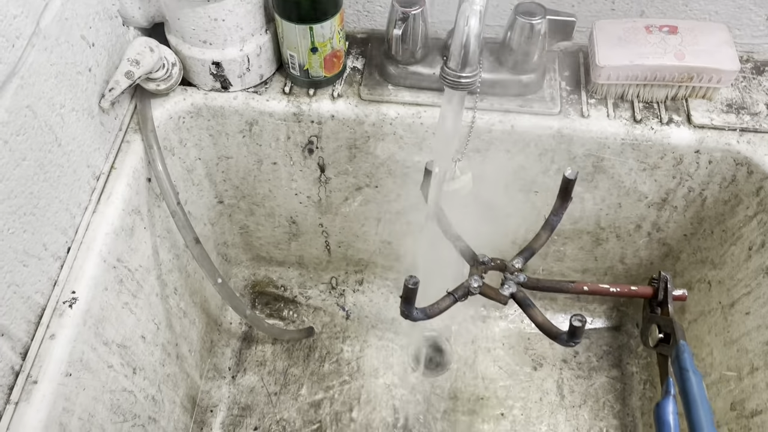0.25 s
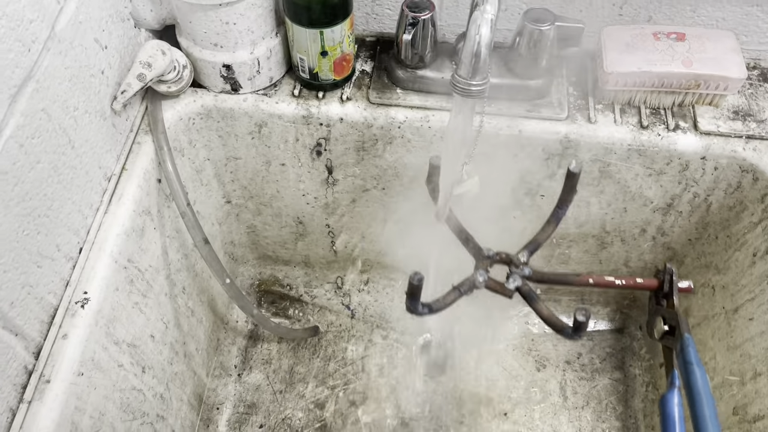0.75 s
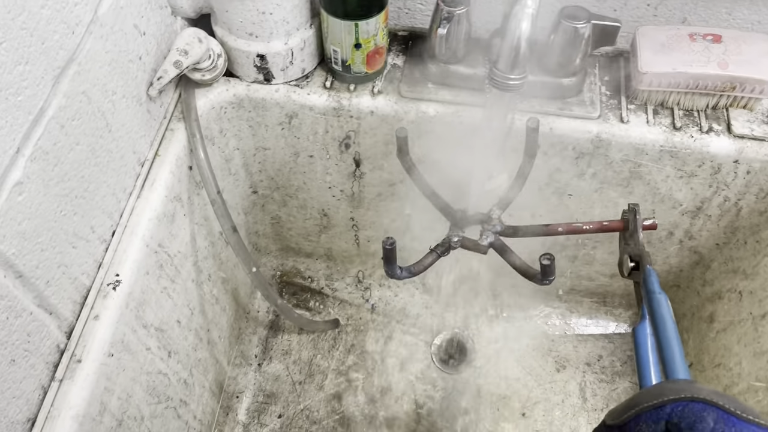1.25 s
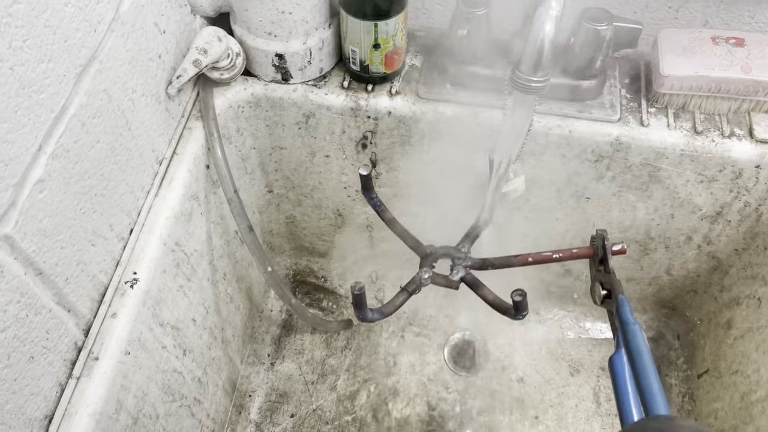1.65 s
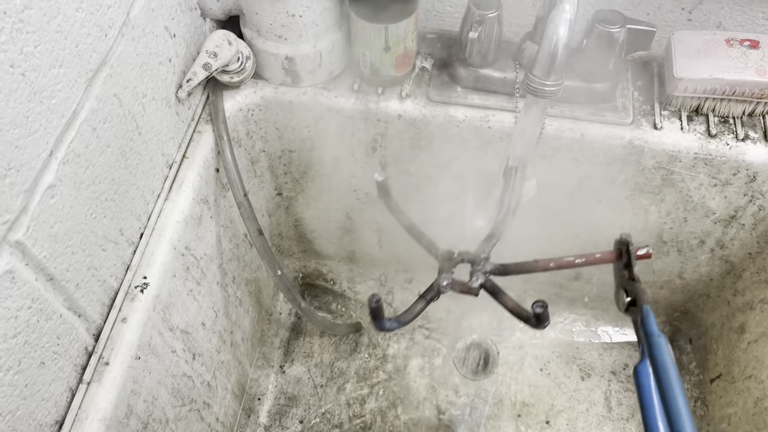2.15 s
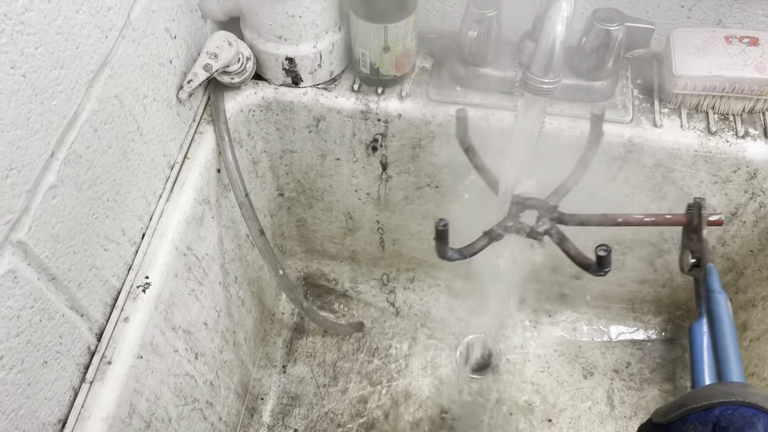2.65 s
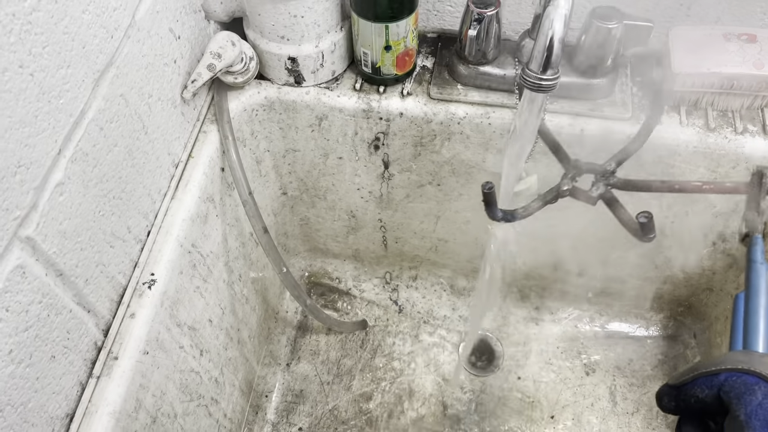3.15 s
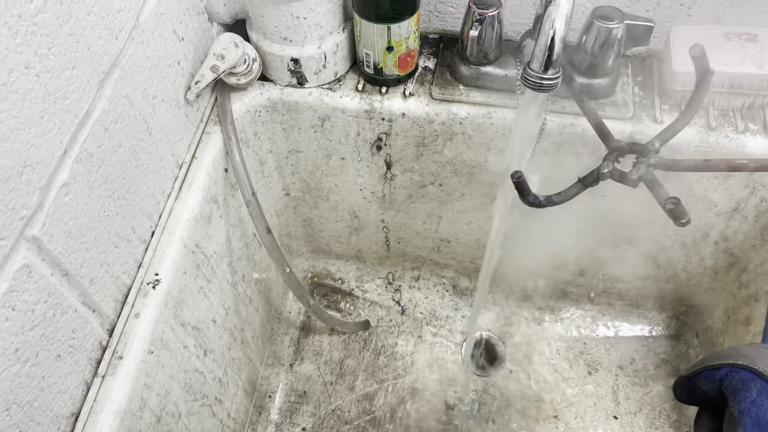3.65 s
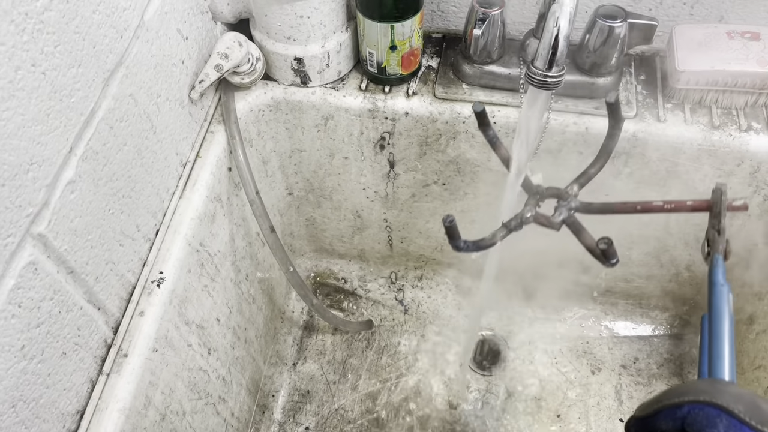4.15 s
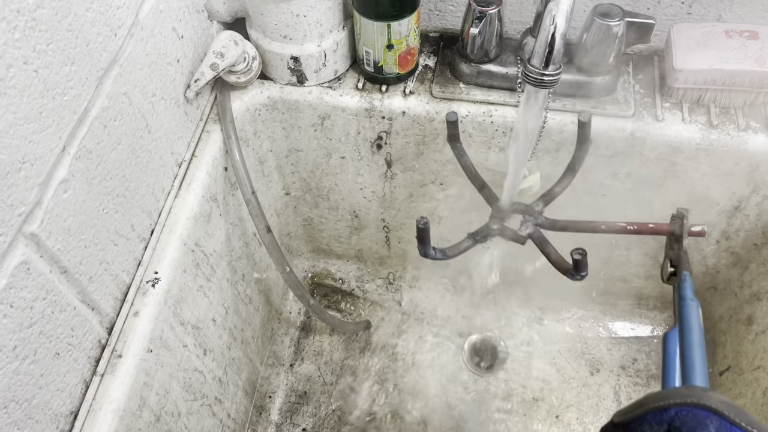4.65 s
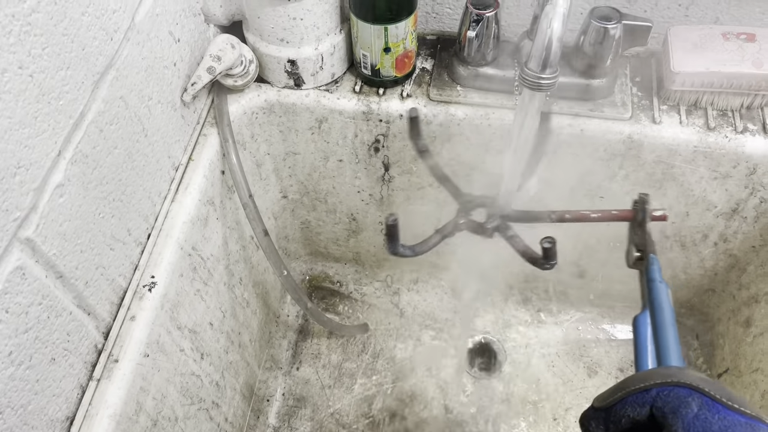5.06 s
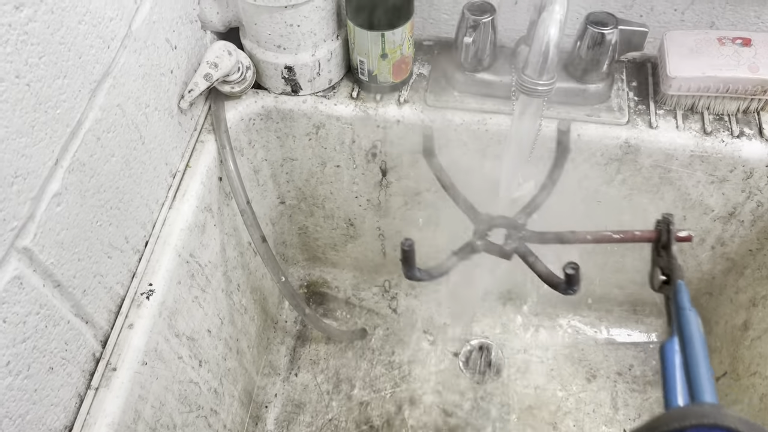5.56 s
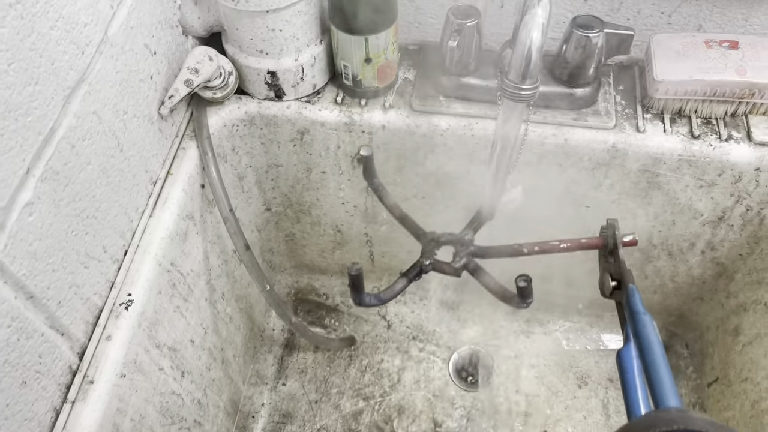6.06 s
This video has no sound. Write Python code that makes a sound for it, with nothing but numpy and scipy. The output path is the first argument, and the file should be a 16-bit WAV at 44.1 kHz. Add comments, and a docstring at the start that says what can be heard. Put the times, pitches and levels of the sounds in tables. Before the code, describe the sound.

Tap water splashes into a deep sink and hisses and sizzles off hot steel, over a low workshop machine hum.

```python
"""Tap water on hot steel.

Water pours into a deep sink, heard close and in stereo. It splashes and boils off
the steel in hiss and sizzle; turbulent flow whistles in the pipe. Bubbles plink,
drops spit, steam spurts. Behind it a workshop machine hums and rumbles, with dull thumps."""
import sys
import numpy as np
from scipy import signal
from scipy.fft import rfft, irfft, next_fast_len
from scipy.io import wavfile
from scipy.ndimage import uniform_filter1d

SR = 44100
rng = np.random.default_rng(int(sys.argv[2]) if len(sys.argv) > 2 else 0)


def to_wav(s):
    """Save 16-bit WAV."""
    ch = np.atleast_2d(s).T  # columns
    pcm = np.round(np.clip(ch, -1, 1) * 32767)  # PCM
    wavfile.write(sys.argv[1], SR, pcm.astype(np.int16))


N = 278271
TIME = np.arange(N) / SR

# Spectra of steam, sizzle and splash: f/Hz, relative density/dB
STEAM_SPECTRUM = [(5000, -14), (7000, -4), (8000, -1), (9500, -1), (11000, 0), (12500, -3), (14000, -5),
                  (16000, -6)]
SIZZLE_SPECTRUM = [(2500, -14.5), (4000, -5), (4800, -7), (5600, -5), (7000, -6), (8500, -5.5),
                   (11000, -14)]
SPLASH_SPECTRUM = [(250, -12.5), (500, 10), (650, -6.5), (1000, 0), (1800, 6), (1950, 1.5), (2500, 3.5),
                   (3500, -1.5), (5000, -8.5), (8000, -24)]
# Boil-off: t/s, steam level/dB, sizzle level/dB
BOIL_LEVELS = [(0, -24, -25), (.14, -27.5, -29.5), (.27, -23, -26), (.33, -28.5, -28), (.63, -23, -25.5),
               (.82, -25.5, -27.5), (.87, -31, -32.5), (1.03, -28, -32.5), (1.25, -27, -25),
               (1.55, -28, -29), (1.9, -29.5, -32), (2.08, -28.5, -30), (2.17, -21.5, -30.5),
               (2.36, -31.5, -31), (2.7, -29.5, -30), (2.9, -31, -39), (3.08, -30.5, -38),
               (3.17, -26, -27.5), (3.75, -24, -28.5), (4.05, -26, -27.5), (4.37, -32.5, -38),
               (4.9, -30.5, -32), (5.95, -33.5, -35), (6.17, -29, -34.5), (6.22, -24.5, -26),
               (6.31, -32, -35)]
# Splash swells and dips: centre t/s, length/s, gain/dB
SPLASH_SWELLS = [(0.16, 0.035, 5.5), (1.047, 0.044, 1.5), (1.608, .2, 1), (2.097, .12, 0.5),
                 (2.29, 0.1, -1.5), (2.84, 0.072, 4.5), (3.585, 0.11, 4), (3.712, .1, 6), (4.258, 0.052, 1)]


def spray():
    """Water boils off the steel, sputtering at random; the splash partly follows the sizzle."""
    steam_db, sizzle_db = columns(BOIL_LEVELS, TIME) + 0.5 * wander(rate_hz=12)
    slosh_db = 0.19 * (sizzle_db - sizzle_db.mean()) - 0.26 * wander(rate_hz=8)
    slosh_db += sum(db * np.exp(-(2 * (TIME - s) / length) ** 2) for s, length, db in SPLASH_SWELLS)
    splash = gain_of(-42.5) * patter()
    splash += gain_of(-34) * noise(SPLASH_SPECTRUM, size=512, patchy_db=2.5, flicker_db=1.1)
    sizzle = noise(SIZZLE_SPECTRUM, size=256, patchy_db=2.0, flicker_db=0.9)
    steam = noise(STEAM_SPECTRUM, size=256, patchy_db=0.0, flicker_db=1.4)
    return gain_of(steam_db) * steam + gain_of(sizzle_db) * sizzle + gain_of(slosh_db) * splash


def patter(per_pitch_per_s=15):
    """Fine bubbles ring at random times on ten pitches; rms 1."""
    out = np.zeros((2, N))
    for hz in np.geomspace(2400, 9000, 10):
        hit_db = 1.8 * np.minimum(rng.exponential(1, (2, N)), 4)
        hits = gain_of(hit_db) * (rng.random((2, N)) < per_pitch_per_s / SR)
        out += signal.oaconvolve(hits, bubble(hz, t60=25 / hz, glide=0.58)[None], axes=1)[:, :N]
    return evened(out)


def bubble(hz, t60, glide):
    """A short ring whose pitch climbs as the bubble nears the surface."""
    t = np.arange(int(t60 * SR) + 8) / SR
    envelope = (1 - np.exp(-t / (0.09 * t60))) * gain_of(-60 * t / t60)
    return envelope / envelope.max() * np.sin(2 * np.pi * hz * (t + glide * t ** 2 / t60))


# Pipe resonances: f/Hz, width/Hz, relative level/dB, share of swell
PIPE_BANDS = [(493, 47, -8, -0.063), (670.5, 17, -15.5, 0), (756, 51, -12, 0.083), (918, 70, -8, -0.046),
              (1171, 41, -9.5, 0), (1263, 73, -20, -0.47), (1375.5, 44, 0.5, 0.24), (1440, 7.4, -12, 0.65),
              (1560, 73, -7.5, 0.29), (1735, 67, -8, -0.098), (2270, 14.5, -14, -0.43),
              (4350, 68, -8.5, 0.45), (4633, 73, -2.5, 0.71), (4840, 150, -8.5, 1.2),
              (5238, 250, -7, -0.08), (5885, 29, -5.5, .6), (5940, 260, -6.5, 0.13), (8880, 210, 0.5, .3),
              (11600, 110, -16, -0.27)]


def pipe_whistle(level_db=-34, fade_db_per_s=-0.5, swell_db=12.5, swell_at_s=2.8, spread_s=0.22):
    """Turbulent flow whistles in the pipe; midway some bands swell and others recede."""
    control_db = -swell_db / (1 + np.exp((TIME - swell_at_s) / spread_s))
    return gain_of(level_db + fade_db_per_s * TIME) * bands(PIPE_BANDS, control_db, breath_db=1.0)


# Bubbles, small from drops, large in the drain: t/s, ring peak/dB, start f/Hz
BUBBLE_PLINKS = [(.139, -24, 655), (.5711, -20, 2190), (.8, -26.5, 677), (1.051, -24, 736),
                 (1.517, -12.5, 2500), (1.633, -17, 2400), (1.7754, -18.5, 2160), (1.8507, -17.5, 3140),
                 (1.861, -19, 2290), (2.06, -28, 800), (2.113, -23, 660), (2.2583, -21, 2500),
                 (2.26, -23.5, 678), (2.297, -24, 650), (2.332, -26, 680), (2.4558, -17.5, 2820),
                 (2.4683, -14.5, 2590), (2.839, -26, 670), (4.243, -23.5, 650), (4.3061, -24, 2560),
                 (4.6683, -14, 3430), (4.673, -27, 2800), (5.2769, -22, 3100), (5.4675, -20, 3400),
                 (5.685, -16.5, 2500), (6.1833, -17.5, 2920), (6.2213, -16, 3460), (6.232, -20, 3560)]


def plinks(ring_cycles=19, splat_db=-14):
    """Single bubbles ring; water closing over each adds a splat around the same pitch."""
    out = np.zeros(N)
    for s, db, hz in BUBBLE_PLINKS:
        ring = bubble(hz, t60=ring_cycles / hz, glide=0.28)
        splat = evened(resonate(rng.standard_normal(4096)[:len(ring)], hz, width_hz=1.2 * hz))
        splat *= gain_of(splat_db - 40 * np.arange(len(splat)) / len(splat))
        add(out, s, gain_of(db) * (ring + splat))
    return out


# Droplet bursts: t/s, start level/dB, f/Hz
DROPLET_SPITS = [(0.825, -20, 10000), (1.763, -19, 8500), (1.7953, -21.5, 10200), (1.869, -23, 10100),
                 (1.9, -18.5, 6000), (2.7706, -22, 11000), (2.819, -21, 9000), (3.92, -28, 10900),
                 (4.228, -21, 7200), (4.87, -23, 8000), (5.43, -25, 12000), (5.787, -19, 7950)]


def spits(t60_s=0.025):
    """Droplets burst on the hot steel in ticks of bright noise."""
    out = np.zeros(N)
    t = np.arange(400) / SR
    for s, db, hz in DROPLET_SPITS:
        burst = evened(resonate(rng.standard_normal(len(t)), hz, width_hz=2100))
        add(out, s, gain_of(db - 60 * t / t60_s) * burst)
    return out


# Steam jets: t/s, length/s, level/dB, start f/Hz, end f/Hz
STEAM_SPURTS = [(2.1, .055, -28.5, 12000, 11200), (2.145, .06, -27, 9700, 10800),
                (3.915, .035, -33, 10800, 10800), (6.198, .032, -33, 11300, 10500),
                (6.225, .03, -31, 6500, 4500), (6.262, .048, -32, 6200, 5800)]


def spurts(width_hz=2300):
    """Steam escapes in short jets, each a gliding band of noise."""
    out = np.zeros(N)
    for s, length, db, start_hz, end_hz in STEAM_SPURTS:
        white = rng.standard_normal(8192)[:int(length * SR)]
        hz = np.linspace(start_hz, end_hz, len(white))
        jet = evened(resonate(resonate(white, hz, width_hz), hz, width_hz))
        add(out, s, gain_of(db) * jet * signal.windows.tukey(len(jet), 0.7))
    return out


def sink_walls(sound, t60_s=0.018):
    """The walls scatter a sound. Rows: direct plus reflections, other reflections alone."""
    response = rng.standard_normal((2, 1800)) * gain_of(-60 * np.arange(1800) / SR / t60_s)
    response /= np.linalg.norm(response[0])
    scattered = signal.oaconvolve(sound[None], response, axes=1)[:, :N]
    return np.array([sound + gain_of(-4.5) * scattered[0], scattered[1]])


# Machine roar: f/Hz, relative density/dB
ROAR_SPECTRUM = [(30, -28), (45, -12), (100, -4), (150, -9.5), (260, -12.5), (310, -8.5), (335, -22.5),
                 (450, -32.5), (700, -41), (1300, -54)]
# Room air modes: f/Hz, width/Hz, relative level/dB
ROOM_MODES = [(59.6, 6, -10), (145, 9.6, -8), (171.8, 12, -19), (211.3, 16, -13.5), (227, 8.5, -16.5),
              (295, 17.4, -15.5), (375.3, 15.4, -15.5)]
# Machine tones: f/Hz, level/dB
HUM_TONES = [(43, -38.5), (76, -39), (119.8, -33.5)]


def machine(rumble_db=-31.5, fade_db_per_s=-0.5):
    """Three wavering tones over a low roar that rings in the room, all slowly fading."""
    fade_db = fade_db_per_s * TIME
    ringing = bands([(*mode, 0) for mode in ROOM_MODES], control_db=0, breath_db=1.2)
    roar = gain_of(-2) * noise(ROAR_SPECTRUM, size=2048, patchy_db=0.6, flicker_db=0.7)
    out = gain_of(rumble_db + fade_db + wander(rate_hz=2.5)) * (roar + ringing)
    for hz, db in HUM_TONES:
        cycles = np.cumsum(hz + 0.69 * wander(rate_hz=3.4)) / SR
        rms_db = db + fade_db - fade_db.mean() + 1.3 * wander(rate_hz=8)
        out += np.sqrt(2) * gain_of(rms_db) * np.sin(2 * np.pi * cycles)
    return out


# Dull thumps: t/s, level/dB, f/Hz, width/Hz
MACHINE_THUMPS = [(.21, -25.5, 120, 90), (0.678, -27.5, 130, 35), (1.2, -31.5, 140, 30),
                  (1.76, -27, 133, 60), (2.378, -36, 167, 30), (2.661, -35, 206, 50), (4.7, -27.5, 170, 35),
                  (5.62, -34, 142, 80)]


def thumps(length_s=0.1):
    """The machine thumps: soft-edged pulses of low, narrow noise."""
    out = np.zeros(N)
    for s, db, hz, width_hz in MACHINE_THUMPS:
        white = rng.standard_normal(SR // 2)
        pulse = resonate(resonate(white, hz, width_hz), hz, width_hz)[-int(length_s * SR):]
        add(out, s, gain_of(db) * signal.windows.tukey(len(pulse), 0.6) * evened(pulse))
    return out


def noise(spectrum, size, patchy_db, flicker_db):
    """Two unrelated noises with shared drifting patches and wide flicker; rms 1."""
    hop = size // 4
    frames, hz = N // hop + 5, np.fft.rfftfreq(size, 1 / SR)
    white = rng.standard_normal((frames, len(hz), 5)).T
    patches = blur(white[4], bins=8, frames=16)
    flicker = blur(white[4, ::-1], bins=len(hz) // 3, frames=3)
    gain = gain_of(at_hz(spectrum, hz)[:, None] + patchy_db * patches + flicker_db * flicker)
    spectra = (white[:2] + 1j * white[2:4]) * gain
    return evened(signal.istft(spectra, nperseg=size, noverlap=size - hop)[1][:, :N])


def bands(modes, control_db, breath_db):
    """Two unrelated noises through narrow resonances, each band wavering on its own."""
    size = next_fast_len(N)
    f, rush = np.fft.rfftfreq(size, 1 / SR), rfft(rng.standard_normal((2, size)))
    out = np.zeros((2, N))
    for hz, width_hz, db, share in modes:
        detune = (f - hz) / width_hz
        band = irfft(rush / np.sqrt((1 + 4 * detune ** 2) * (1 + detune ** 2)), size)[:, :N]
        out += gain_of(db + share * control_db + breath_db * wander(rate_hz=6)) * evened(band)
    return out


def resonate(x, hz, width_hz):
    """Band-pass about a fixed or moving centre: shift to 0 Hz, smooth, shift back."""
    carrier = np.exp(2j * np.pi * np.cumsum(hz * np.ones(x.shape[-1])) / SR)
    pole = np.exp(-np.pi * width_hz / SR)
    return 2 * (carrier * signal.lfilter([1 - pole], [1, -pole], x / carrier)).real


def wander(rate_hz):
    """Random drift up to rate_hz; rms 1."""
    t = TIME[::64]
    partials = zip(np.geomspace(rate_hz / 6, rate_hz, 20), rng.random(20))
    drift = sum(np.sin(2 * np.pi * (hz * t + phase)) / np.sqrt(hz) for hz, phase in partials)
    return np.interp(TIME, t, evened(drift))


def blur(field, bins, frames):
    """Moving average over frequency and time; rms 1."""
    return evened(uniform_filter1d(uniform_filter1d(field, bins, axis=0), frames, axis=1))


def gain_of(db):
    """dB to amplitude factor."""
    return 10 ** (np.asarray(db) / 20)


def evened(x):
    """Scales to rms 1."""
    return x / np.sqrt(np.mean(x ** 2) + 1e-20)


def at_hz(points, hz):
    """Interpolates a table over log frequency."""
    f, value = np.transpose(points)
    return np.interp(np.log(hz + 1), np.log(f + 1), value)


def columns(rows, t):
    """Interpolates a table's columns at times t."""
    times, *values = np.transpose(rows)
    return [np.interp(t, times, column) for column in values]


def add(mix, s, sound):
    """Mixes a sound in at s seconds."""
    part = mix[round(s * SR):][:len(sound)]
    part += sound[:len(part)]


# Left-right likeness, locked in the bass and three high bands: f/Hz, coherence
STEREO_COHERENCE = [(60, 1), (160, .99), (260, .85), (400, .45), (900, .7), (1400, .75), (2000, .45),
                    (2400, .65), (3000, .5), (4600, .65), (5500, .4), (5900, .75), (7300, .7), (7700, 1),
                    (8300, 1), (9500, .82), (10800, .85), (11100, 1), (12000, 1), (12600, .75),
                    (14000, .75), (14500, 1)]
# Left-right phase, opposed near 8 kHz and above 14.5 kHz: f/Hz, left minus right/rad
STEREO_PHASE = [(0, 0), (250, .1), (430, 1.3), (600, .2), (1200, 0), (1650, -1.1), (2300, .1), (2900, .35),
                (3500, 0), (4900, .4), (5600, -.6), (6400, -.7), (7450, -2.3), (7700, -np.pi),
                (8300, -np.pi), (11050, -2 * np.pi), (12300, -2.05 * np.pi), (12550, -7.2),
                (14450, -3 * np.pi)]
# Balance: f/Hz, left minus right/dB
STEREO_BALANCE = [(60, -.7), (150, 0), (280, 2.5), (500, -1.5), (700, 1.5), (1500, 1.7), (2800, 2.5),
                  (3600, 1), (4900, 4.5), (5900, 1), (7500, 0)]


def scene():
    """Left is the direct sound; right blends it with a scattered one and shifts the phase."""
    mix = spray() + pipe_whistle() + sink_walls(plinks() + spits() + spurts()) + machine() + thumps()
    size = next_fast_len(N + 4096)
    hz = np.fft.rfftfreq(size, 1 / SR)
    direct, scattered = rfft(mix, size)
    coherence = np.clip(at_hz(STEREO_COHERENCE, hz), 0, 1)
    right = coherence * direct + np.sqrt(1 - coherence ** 2) * scattered
    right *= np.exp(-1j * np.interp(hz, *np.transpose(STEREO_PHASE)))
    tilt = gain_of(at_hz(STEREO_BALANCE, hz) / 2)
    return irfft(np.array([direct * tilt, right / tilt]), size)[:, :N]


def record(dry):
    """Microphone bass roll-off, then the band limit."""
    low_hz, high_hz = 36, 15720
    highpass = signal.butter(8, low_hz, "high", fs=SR, output="sos")
    lowpass = signal.firwin(1023, high_hz, window=("kaiser", 9), fs=SR)
    return signal.oaconvolve(signal.sosfilt(highpass, dry), lowpass[None], "same")


dry = scene()
out = record(dry)
to_wav(out)
```